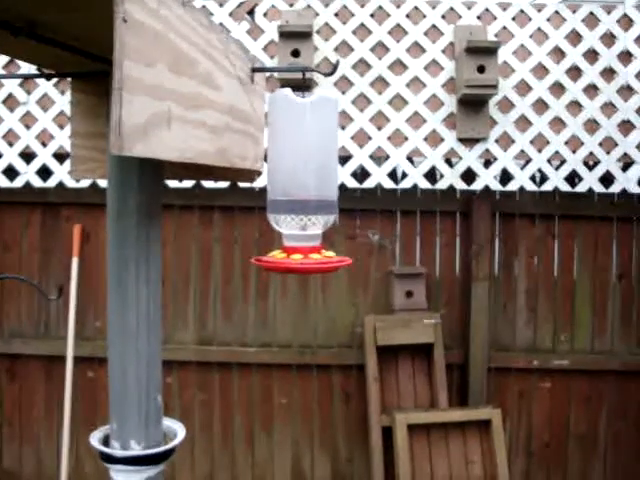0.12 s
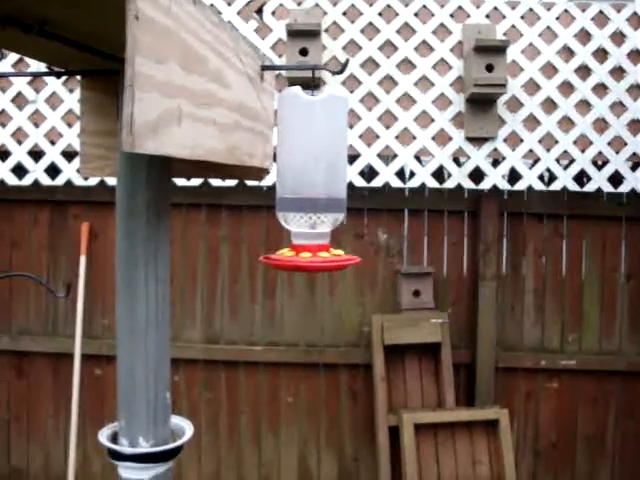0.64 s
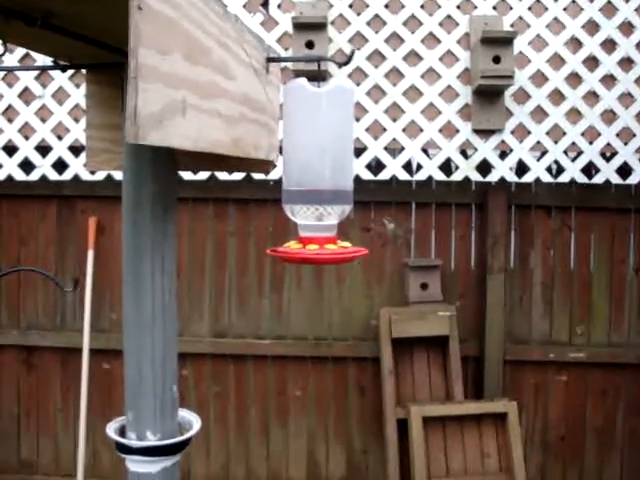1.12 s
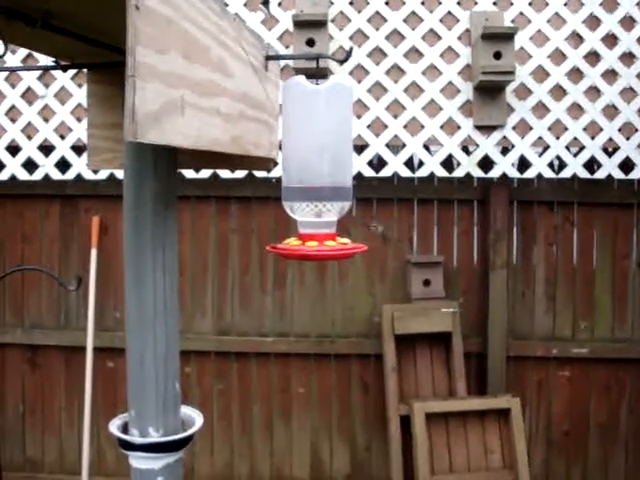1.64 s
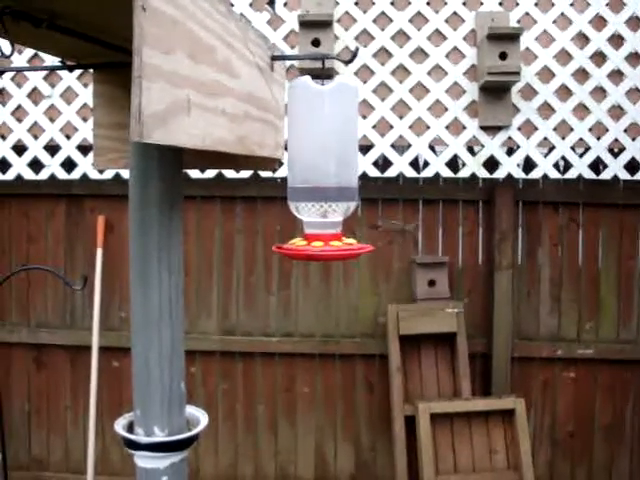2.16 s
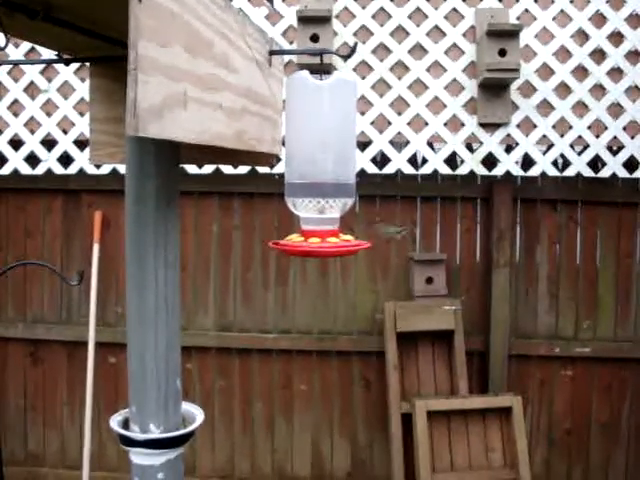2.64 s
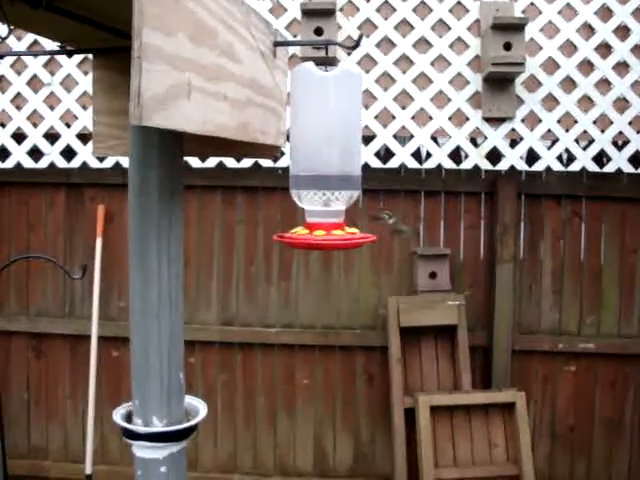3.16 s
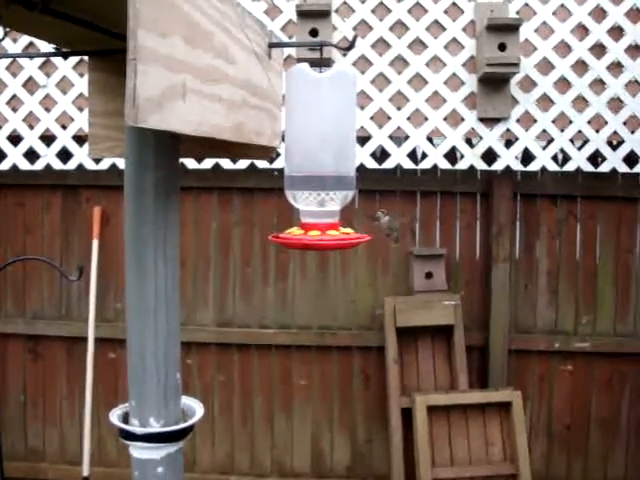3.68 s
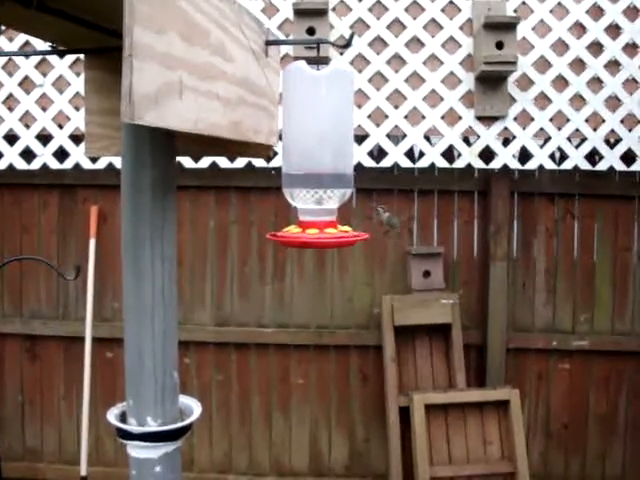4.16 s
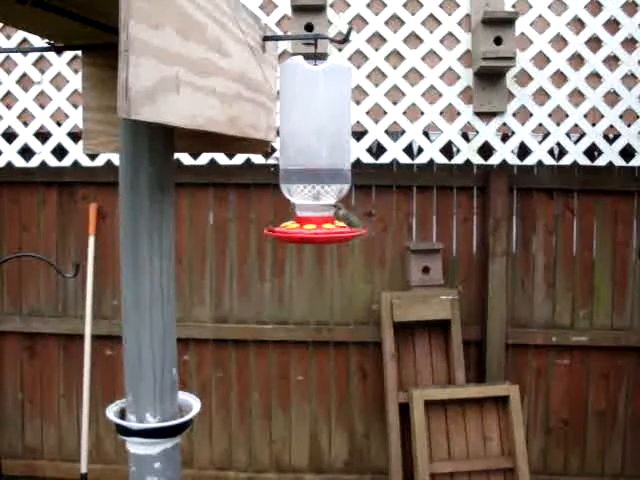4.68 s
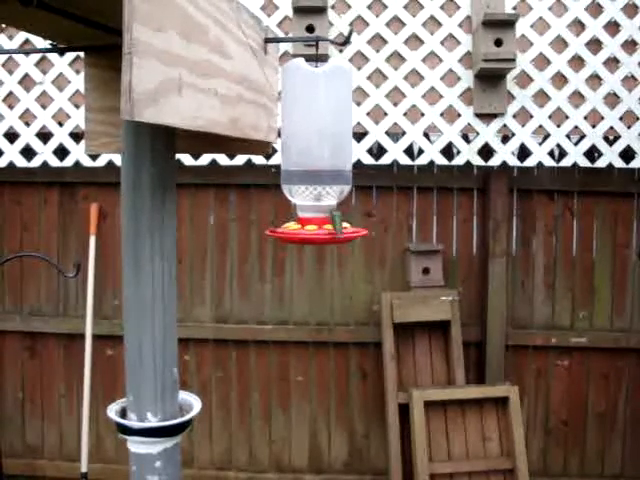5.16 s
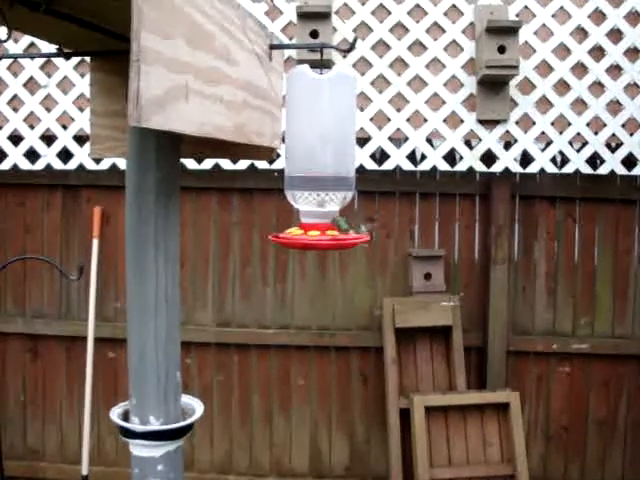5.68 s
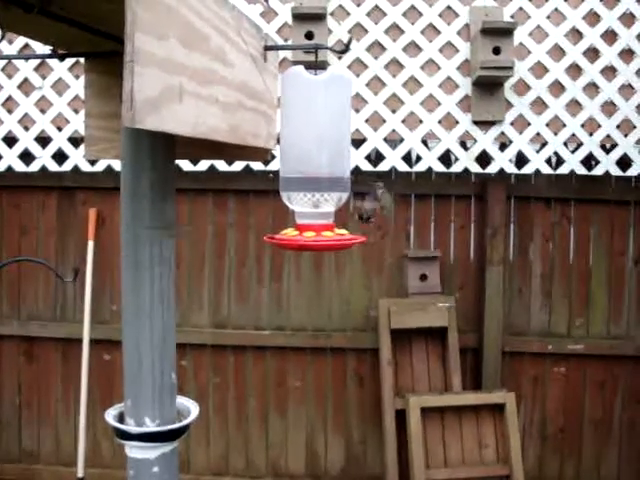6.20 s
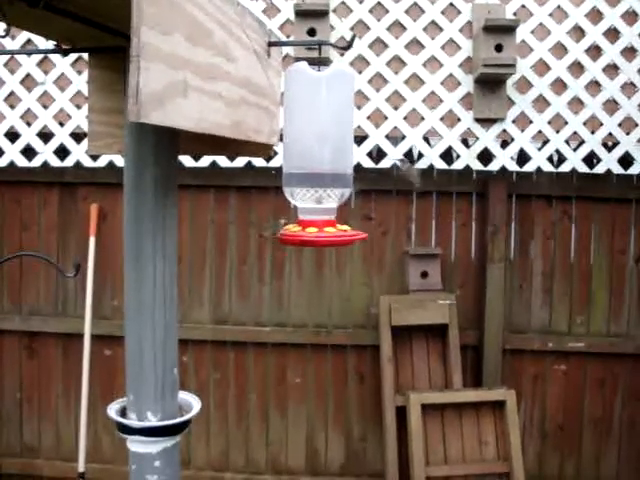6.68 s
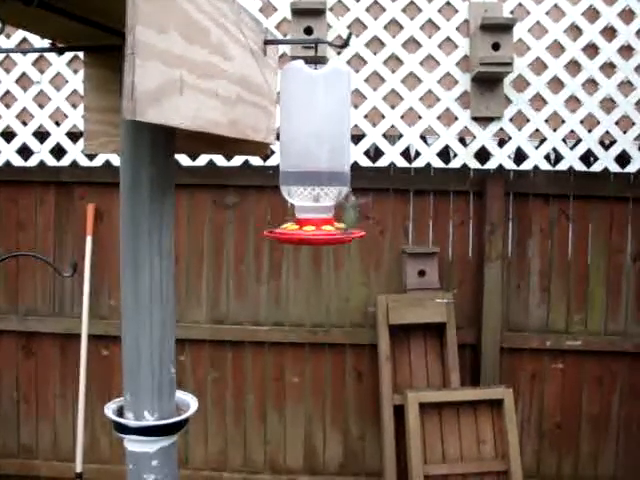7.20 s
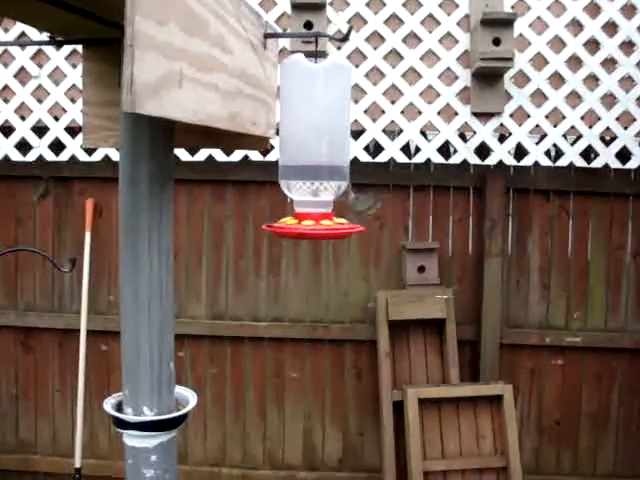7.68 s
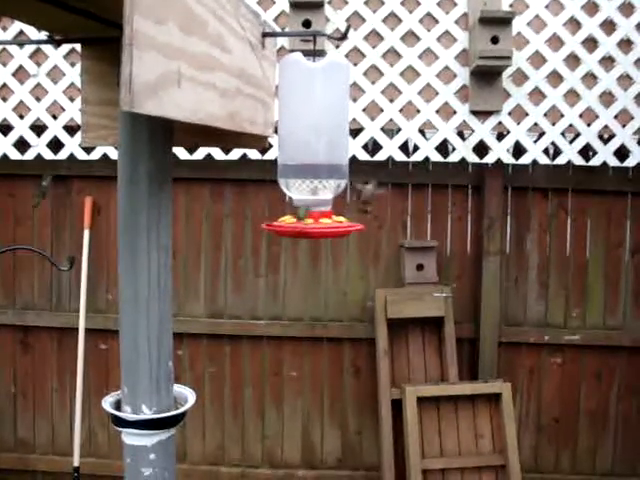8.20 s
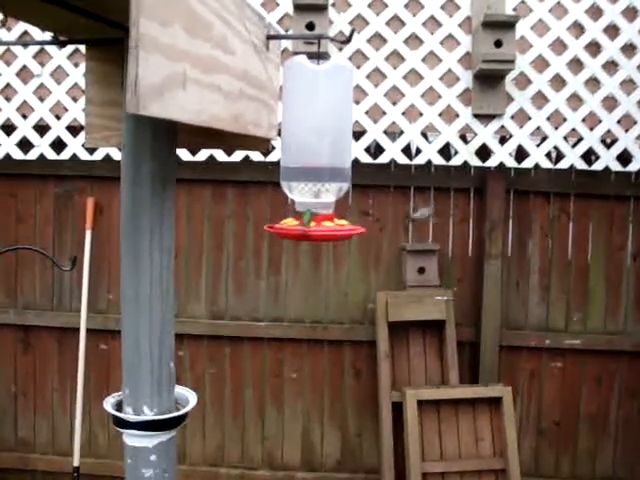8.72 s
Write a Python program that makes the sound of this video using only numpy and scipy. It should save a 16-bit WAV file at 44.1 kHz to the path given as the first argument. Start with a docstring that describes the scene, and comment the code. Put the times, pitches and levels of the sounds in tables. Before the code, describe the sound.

From 0 to about 1.2 s a car's tyre roar, a mid-low airy rush with slight rumble and a sinking engine note, is at its loudest behind a backyard fence; it then recedes, faint by 5 s and almost gone by the end. A shrill, dense cicada buzz near 5-6 kHz holds unbroken and nearly level throughout, with a faint fast throb. Hummingbirds are sparse at first: a thin whistle at 1.2 s, light ticks at 2.3 s, a clear chip at 2.6 s. From 4.9 s tiny falling chips come frequently, with a thin high whistle at 5.3 s. At 6.1 s a loud rapid tick rattle and squeal bursts out, followed by bright chattering chips until 6.65 s. Softer chips continue, scattering after 8 s. A very faint distant motor hum joins after 5 s. Mono, short fence scatter, soft air noise.

```python
"""Tyre roar fills the start as a car rolls away down a street behind the fence, under a drone of cicadas.
The cicadas, a noise band plus ringing tymbal clicks, hold on in the backyard while the car's noise fades.
Hummingbirds at a feeder give falling overtone chips, swept ticks, pulsed rasps and thin sine whistles.
The fence scatters the calls, a machine hums far off, and air noise lies beneath.
One microphone feeds both channels."""
import sys
import numpy as np
from scipy import signal
from scipy.fft import rfft, irfft, next_fast_len
from scipy.io import wavfile
from scipy.ndimage import uniform_filter1d, minimum_filter1d, map_coordinates

SR = 44100
rng = np.random.default_rng(int(sys.argv[2]) if len(sys.argv) > 2 else 0)


def wav_record(signal):
    """Record a signal, one row per channel, as 16-bit PCM in the file named by sys.argv[1]."""
    frames = np.transpose(np.atleast_2d(signal))
    bounded = np.clip(frames, -1, 1)
    # unit amplitude maps onto the largest positive 16-bit level
    quanta = np.round(bounded * 32767).astype(np.int16)
    wavfile.write(sys.argv[1], SR, quanta)


def convert_level_to_amplitude(level_db):
    """Map a level in decibels to its linear amplitude factor."""
    exponent = np.asarray(level_db, float) / 20
    return 10 ** exponent


N = 389398

# Spectrum shapes of the noise beds, levels relative: pitch_hz [Hz], level_db [dB per Hz]
# far cicadas blurred together
CHORUS_SPECTRUM = [(4300, -23), (4750, -9.5), (5050, -3.5), (5320, 5), (5510, -5.5), (5750, -1),
                   (6000, -38), (6150, -57.5), (6600, -31)]
# tyre roar
TYRE_SPECTRUM = [(210, -46.5), (350, -21.5), (430, -10.5), (650, -3.5), (880, 1), (1150, 0.5), (1350, -3),
                 (1610, -8), (2360, -13.5), (4400, -25), (9000, -43)]
# a deeper note and a hiss of the tyres, heard only close by
CLOSE_TYRE_SPECTRUM = [(400, -31.5), (540, -1.5), (720, 2), (900, -19), (2000, -13.5), (3500, -17.5),
                       (5000, -37)]
# low rumble of the street
RUMBLE_SPECTRUM = [(25, -51), (50, -41), (80, -15.5), (112, -13), (157, -4), (267, -3), (419, -4.5),
                   (600, -7), (900, -44.5)]
# far town and microphone hiss
AIR_SPECTRUM = [(25, -46), (55, -28), (100, -12.5), (206, -9), (592, -5.5), (863, -3.5), (1200, -4.5),
                (1500, -10.5), (4200, -20.5), (6440, -17.5), (8000, -21.5), (9900, -21.5)]

# Levels over time: time_s [s], level_db [dB]
# whole cicada chorus
CHORUS_LEVEL = [(0, -45.5), (1.5, -46), (1.8, -45), (3.3, -47), (6.2, -45.5), (7.2, -45), (8.83, -46.5)]
# tyre roar as the car leaves
TYRE_LEVEL = [(0, -36.5), (.2, -36.5), (.45, -36), (.7, -38), (.95, -37), (1.08, -38), (1.45, -42),
              (1.75, -41.5), (2.5, -43.5), (3.2, -45), (3.7, -47), (4.7, -50), (6.4, -53), (8.83, -57)]
# low rumble
RUMBLE_LEVEL = [(0, -47.5), (1.2, -50.5), (1.5, -58), (1.75, -51.5), (2.5, -61.5), (4.2, -60), (6.4, -60.5),
                (6.9, -65.5), (7.2, -57), (7.8, -62), (8.83, -61.5)]

# Nearer cicadas: tymbal_hz [Hz], ring_t60_s [s], click_pairs [per s],
# level_db [dB against the far chorus], throb_db [dB]
NEAR_CICADAS = [(5087, 0.018, 71.5, -9.5, 0.35), (5337, 0.037, 63, -13.5, -5), (5561, 0.063, 96, -5, 1.5),
                (5573, 0.0097, 69, -5, 1), (5714, 0.11, 75, -13, 2.5), (5854, 0.0039, 70.5, -11, 2.5)]
# What the hollow abdomen radiates: pitch_hz [Hz], level_db [dB]
ABDOMEN = [(4200, -19.5), (4800, -3.5), (6020, 1), (6200, -13), (7000, -31)]

# Falling chips: start_s [s], length_s [s], start_hz [Hz], level_db [dB],
# treble_db [dB, strength of the treble partials]
CHIP_CALLS = [(2.611, .0085, 2310, -45.5, -13), (4.921, 0.0083, 1950, -59, -12),
              (5.056, 0.018, 2080, -52.5, -11.5), (5.34, .013, 2220, -53, -22),
              (5.489, 0.014, 2900, -58, -27), (5.596, .012, 2904, -57.5, -14),
              (5.7437, .016, 2400, -58, -11), (5.87, .012, 2321, -51, -14.5), (5.997, 0.016, 2240, -57, -8),
              (6.236, .016, 2194, -56, -10), (6.342, 0.027, 3540, -47.5, -1),
              (6.39, 0.0113, 2520, -52, -30), (6.42, 0.018, 3380, -47.5, 2), (6.487, .026, 3490, -49, 7),
              (6.559, .027, 3300, -50.5, 6), (6.634, .024, 3120, -53.5, -1.5),
              (6.866, .009, 2420, -52, -29), (6.953, 0.022, 2295, -49.5, -12),
              (7.3061, .017, 2510, -52, -10.5), (7.373, .0099, 3520, -57, -30),
              (7.472, .014, 3077, -54.5, -19), (7.554, .016, 3170, -53, -9), (7.618, .012, 1900, -58, -12),
              (7.669, .016, 2339, -49.5, -13.5), (7.7113, 0.018, 2250, -58, -10),
              (7.7612, .013, 2320, -52.5, -10), (7.9009, .013, 3540, -60, -15),
              (7.964, 0.011, 2050, -59, -8), (8.233, .02, 3280, -51, -14), (8.464, .013, 2020, -56, -8),
              (8.766, .015, 2079, -54, -13)]
# Overtone strength from the beak: pitch_hz [Hz], level_db [dB]
BEAK_RESPONSE = [(1200, -3), (1800, 3), (4200, 6), (5000, -4), (6200, 0)]
# Runs of ticks: start_s [s], ticks [count, rounded], gap_s [s], level_db [dB], from_hz [Hz], to_hz [Hz]
TICK_RUNS = [(2.27, 4, .012, -51, 5900, 7500), (2.53, 1, .011, -52.5, 5990, 9000),
             (2.565, 2, .008, -55, 5940, 9050), (5.432, 5.5, .0111, -49, 6300, 8300),
             (6.0812, 6, .0151, -38, 3386, 10200), (6.191, 1.07, .011, -49, 2575, 10070)]
# Rasps: start_s [s], length_s [s], level_db [dB], from_hz [Hz], to_hz [Hz]
RASP_CALLS = [(5.573, .05, -61, 6300, 10000), (6.071, 0.067, -60, 3450, 5200),
              (6.24, 0.041, -46.5, 2270, 9600), (7.11, .03, -62, 6300, 10100),
              (8.423, .06, -62, 3500, 9500)]
# Whistles: start_s [s], length_s [s], start_hz [Hz], end_hz [Hz], level_db [dB]
WHISTLE_CALLS = [(1.168, 0.051, 4740, 4640, -51), (1.675, 0.12, 6750, 6830, -59),
                 (1.975, .055, 7180, 7690, -57), (4.385, 0.0316, 3570, 3465, -57.5),
                 (5.314, 0.0754, 7030, 7050, -42.5), (6.78, 0.054, 2100, 2210, -57),
                 (6.789, .04, 3050, 3450, -60), (6.881, 0.054, 3450, 3780, -62)]
# A widely swinging whistle inside the loudest run of ticks, same columns
SQUEAL_CALLS = [(6.088, .042, 6350, 6030, -40)]

# Far motor, then the car's engine note; each a list of time_s [s], pitch_hz [Hz], level_db [dB]
HUM_TRACKS = [
    [(5, 151, -70.5), (7.24, 152.7, -65.5), (8.83, 151, -66.5)],
    [(0, 64, -67), (1.1, 57.2, -80)],
]


def cicadas(level_db):
    """Far singers blur into a band of noise; near ones buckle two tymbals in turn, each click ringing the body."""
    chorus = rush(CHORUS_SPECTRUM, patchy_db=0.37)
    t = np.arange(SR // 10) / SR
    throb_hz = 8.3 + 0.21 * wobble(0.86)
    # one throb shared by all; a negative depth swells while the others sink
    throb = np.sin(2 * np.pi * np.cumsum(throb_hz) / SR)
    for tymbal_hz, t60_s, pairs, singer_db, throb_db in NEAR_CICADAS:
        clicks_per_s = 2 * pairs * (1 + 0.012 * wobble(1.5))
        count = np.floor(np.cumsum(clicks_per_s) / SR + rng.random())
        second_db = -5 * (count % 2)  # one tymbal faces away
        clicks = np.diff(count, prepend=count[0]) * convert_level_to_amplitude(second_db + 1.85 * rng.standard_normal(N))
        # no two buckles start the ring alike
        clicks = clicks * np.exp(1j * 1.51 * rng.standard_normal(N))
        onset = 1 - np.exp(-t / 0.00029)
        ring = convert_level_to_amplitude(-60 * t / t60_s) * onset * np.exp(2j * np.pi * tymbal_hz * t)
        song = coloured(signal.fftconvolve(clicks, ring)[:N].real, ABDOMEN)
        chorus += convert_level_to_amplitude(singer_db + throb_db * throb + 0.6 * wobble(0.66)) * unit(song)
    return convert_level_to_amplitude(level_db) * unit(chorus)


def street(tyre_db, rumble_db):
    """Tyre roar with a close component that fades faster than it, and a low rumble, all as shaped noise."""
    close_db, close_slope = -45.5, 1.82  # level at the car's loudest; dB lost per dB of roar
    roar = convert_level_to_amplitude(tyre_db + 0.83 * wobble(7.2)) * rush(TYRE_SPECTRUM, patchy_db=0.53)
    close_db = close_db + close_slope * (tyre_db - tyre_db.max())
    close = convert_level_to_amplitude(close_db) * rush(CLOSE_TYRE_SPECTRUM, patchy_db=1.0)
    rumble = convert_level_to_amplitude(rumble_db) * rush(RUMBLE_SPECTRUM, patchy_db=1.1)
    return roar + close + rumble


def hummingbirds():
    """All calls around the feeder, each voice mixed into one track."""
    track = np.zeros(N + SR)  # spare second for calls near the end
    for call in (chips, ticks, rasps, whistles):
        call(track)
    return track[:N]


def chips(track):
    """Falling overtone stacks; the tiny membranes flutter in strength and pitch."""
    slack_hz, drop_left, sag_s = 1256, 0.52, 0.035  # pitch falls toward slack, further in longer chips
    for start_s, length_s, start_hz, level_db, treble_db in CHIP_CALLS:
        end_hz = slack_hz + (start_hz - slack_hz) * drop_left * np.exp(-length_s / sag_s)
        # the second partial is stronger in bright chips, weaker in high ones
        second_db = 6 + 0.34 * treble_db - 2.5 * start_hz / 1e3
        t, swell = arch(length_s, sharp=0.36)
        knots = np.array([t, t + 0.038]) * 380  # two stretches of one random curve
        pitch_flutter, level_flutter = map_coordinates(rng.standard_normal(32), [knots])
        hz = start_hz * (end_hz / start_hz) ** (t / length_s) * (1 + 0.027 * pitch_flutter)
        breath = convert_level_to_amplitude(level_db + treble_db - 8.5) * swell * band(6300, 10000, len(t))
        add(track, start_s + 0.39 * length_s, breath)
        response = BEAK_RESPONSE + [(7200, treble_db), (9800, treble_db), (11000, -41.5)]
        for k in range(1, 7):
            strength_db = along(response, k * hz) + second_db * (k == 2) + 2.9 * level_flutter
            cycles = k * np.cumsum(hz) / SR + rng.random()
            add(track, start_s, convert_level_to_amplitude(level_db + strength_db) * swell * np.sin(2 * np.pi * cycles))


def ticks(track):
    """Each tick is a short dip and a very fast upward sweep with a puff of air; a run swells and fades."""
    for first_s, ticks_in_run, gap_s, level_db, from_hz, to_hz in TICK_RUNS:
        count = round(ticks_in_run)
        for k in range(count):
            tick_s = first_s + k * gap_s
            size = convert_level_to_amplitude(level_db) * np.sin(np.pi * (k + 0.5) / count) ** 0.31
            t, swell = arch(0.008, sharp=0.3)
            corners_s = [0, 0.0058, 0.008]
            hz = np.interp(t, corners_s, [from_hz + 1500, from_hz, to_hz])
            # a soft dip, then strongest near the top of the snap
            tilt = convert_level_to_amplitude(np.interp(t, corners_s, [-16, -4, 1]))
            cycles = np.cumsum(hz) / SR + rng.random()
            add(track, tick_s - 0.0068, size * swell * tilt * np.sin(2 * np.pi * cycles))
            t, swell = arch(0.0049, sharp=1.5)
            puff = convert_level_to_amplitude(-0.3) * size * swell * band(from_hz, to_hz, len(t))
            add(track, tick_s - 0.004, puff)


def rasps(track):
    """The bird's air chopped by its voice: band noise pulsed at a steady rate."""
    pulses_per_s = 176
    for start_s, length_s, level_db, from_hz, to_hz in RASP_CALLS:
        t, swell = arch(length_s, sharp=0.19)
        pulse_db = -4.0 * np.cos(2 * np.pi * pulses_per_s * t)
        add(track, start_s, convert_level_to_amplitude(level_db + pulse_db) * swell * band(from_hz, to_hz, len(t)))


def whistles(track):
    """Thin gliding whistles with a slight warble, and a squeal that swings widely, a little slower than the ticks come."""
    for start_s, *shape in WHISTLE_CALLS:
        add(track, start_s, whistle(*shape, swing=0.015, swings_per_s=50.5))
    for start_s, *shape in SQUEAL_CALLS:
        add(track, start_s, whistle(*shape, swing=0.145, swings_per_s=61))


def whistle(length_s, start_hz, end_hz, level_db, swing, swings_per_s):
    """A gliding sine that warbles in pitch, by a share of it, and flutters in level."""
    t, swell = arch(length_s, sharp=0.13)
    glide_hz = start_hz + (end_hz - start_hz) * t / length_s
    hz = glide_hz * (1 + swing * np.cos(2 * np.pi * swings_per_s * t))
    flutter_db = 1.6 * map_coordinates(rng.standard_normal(32), [t * 170])
    return convert_level_to_amplitude(level_db + flutter_db) * swell * np.sin(2 * np.pi * np.cumsum(hz) / SR)


def fence(calls):
    """A short scattered answer from fence boards and posts: a decaying noise tail."""
    t = np.arange(SR // 8) / SR
    tail = rng.standard_normal(len(t)) * convert_level_to_amplitude(-60 * t / 0.15) * (t > 0.003)
    return signal.fftconvolve(calls, tail / np.linalg.norm(tail))[:N]


def hums():
    """Unsteady sines: a far motor sets in late; the car's engine note sinks away early."""
    out, t = np.zeros(N), np.arange(N) / SR
    for rows in HUM_TRACKS:
        hz, level_db = curves(rows)
        on = (t >= rows[0][0]) & (t <= rows[-1][0])
        tone = np.sqrt(2) * np.sin(2 * np.pi * np.cumsum(hz) / SR)  # rms 1
        out += on * convert_level_to_amplitude(level_db + 0.45 * wobble(3.5)) * tone
    return out


def yard_air():
    """Steady noise of the far town and the microphone's hiss."""
    return convert_level_to_amplitude(-52) * rush(AIR_SPECTRUM, patchy_db=0.4)


def unit(x):
    """Scaled to rms 1."""
    return x / np.sqrt(np.mean(x ** 2))


def along(points, hz):
    """(Hz, value) points read on a log frequency axis."""
    f, v = np.transpose(points)
    return np.interp(np.log(hz + 1), np.log(f + 1), v)


def curves(rows):
    """One value per sample for each column after the time."""
    time_s, *cols = np.transpose(rows)
    return [np.interp(np.arange(N) / SR, time_s, c) for c in cols]


def wobble(rate):
    """A smooth random curve, rate knots a second."""
    knots = rng.standard_normal(int(N * rate / SR) + 4)
    return map_coordinates(knots, [np.arange(N) * rate / SR])


def coloured(x, spectrum):
    """x through a spectrum of (Hz, dB) points."""
    m = next_fast_len(len(x) + SR // 4)
    gain = convert_level_to_amplitude(along(spectrum, np.fft.rfftfreq(m, 1 / SR)))
    return irfft(rfft(x, m) * gain, m)[:len(x)]


def rush(spectrum, patchy_db):
    """Coloured noise of rms 1 with patches of random gain over time and pitch."""
    z = signal.stft(rng.standard_normal(N), nperseg=512)[2]
    field = uniform_filter1d(rng.standard_normal(z.shape), size=5, axis=0)
    field = uniform_filter1d(field, size=12, axis=1)
    patchy = signal.istft(z * convert_level_to_amplitude(patchy_db * unit(field)), nperseg=512)[1][:N]
    return unit(coloured(patchy, spectrum))


def band(from_hz, to_hz, length):
    """A burst of noise of rms 1 between two frequencies, length in samples."""
    edges = [(0.95 * from_hz, -30), (from_hz, 0), (to_hz, -3), (0.95 * to_hz, -30)]
    return unit(coloured(rng.standard_normal(length), edges))


def add(track, start_s, sound):
    """Mixes a sound in at start_s seconds."""
    track[round(start_s * SR):][:len(sound)] += sound


def arch(length_s, sharp):
    """Times, and a swell that starts and ends at nothing."""
    t = np.arange(round(length_s * SR)) / SR
    return t, np.sin(np.pi * t / length_s) ** sharp


def starved(x, from_hz, below_db, reach_s):
    """Above from_hz, a band drops out while it lies far below its own loudest moment close by."""
    hz, t, z = signal.stft(x, SR, nperseg=256)
    hz = hz[:, None]
    power = uniform_filter1d(np.abs(z) ** 2, size=5, axis=0)
    power = np.abs(uniform_filter1d(power, size=2, axis=1)) + 1e-16
    steady = uniform_filter1d(power, size=3, axis=1)
    frames = 2 * int(reach_s / t[1]) + 1
    loudest = -minimum_filter1d(-steady, size=frames, axis=1)
    allowed_db = below_db - 6 * (hz < 4700) - 0.73 * (hz < 6100)  # the middle of the range is spared more
    excess_db = 10 * np.log10(power / loudest) - allowed_db
    kept = 1 / (1 + np.exp(-np.clip(excess_db / 0.43, -30, 30)))
    return signal.istft(z * np.where(hz > from_hz, kept, 1), SR, nperseg=256)[1][:N]


def scene():
    """All sources at one microphone, the same signal in both channels."""
    birds = hummingbirds()
    mono = cicadas(*curves(CHORUS_LEVEL)) + street(*curves(TYRE_LEVEL), *curves(RUMBLE_LEVEL))
    mono += birds + convert_level_to_amplitude(-6) * fence(birds) + hums() + yard_air()
    return np.array([mono, mono])


def low_pass(x):
    """Removes everything above the highest recorded frequency."""
    return signal.sosfilt(signal.butter(12, 10270, fs=SR, output="sos"), x)


def record(dry):
    """One channel, its weak bands thinned and its top cut off, fed to both sides."""
    mono = starved(dry[0], from_hz=2670, below_db=-5.5, reach_s=0.027)
    mono = coloured(mono, [(10009, 0), (10159, -45)])
    return low_pass(np.array([mono, mono]))


dry = scene()
out = record(dry)
wav_record(out)
```